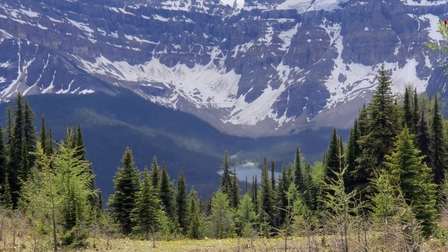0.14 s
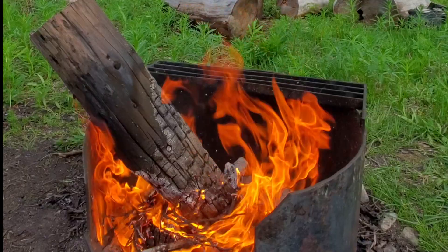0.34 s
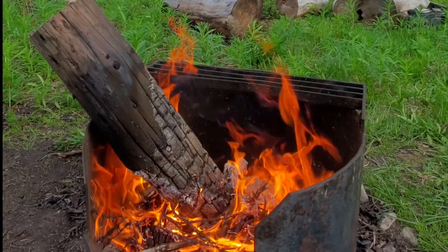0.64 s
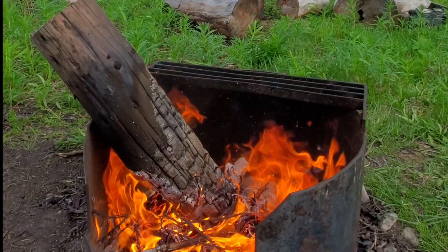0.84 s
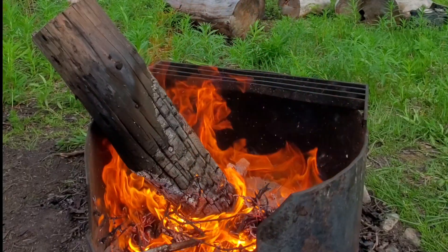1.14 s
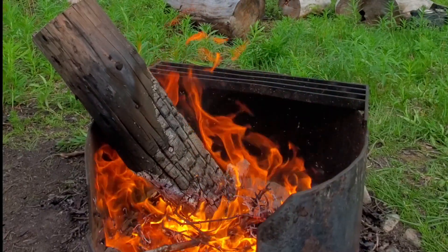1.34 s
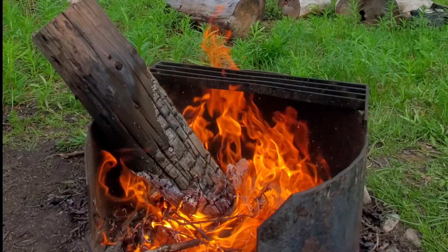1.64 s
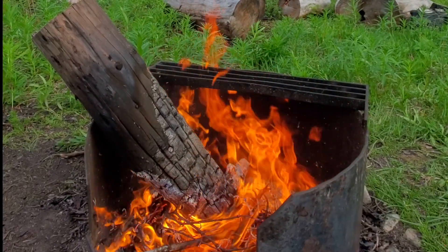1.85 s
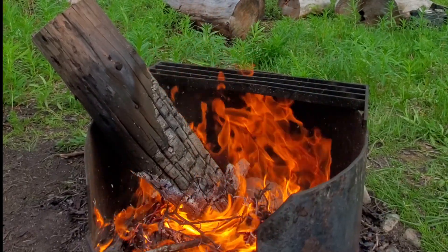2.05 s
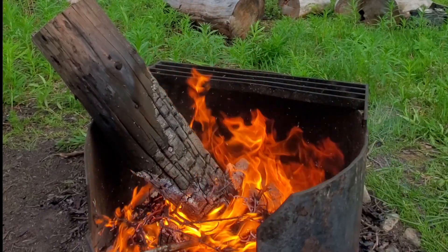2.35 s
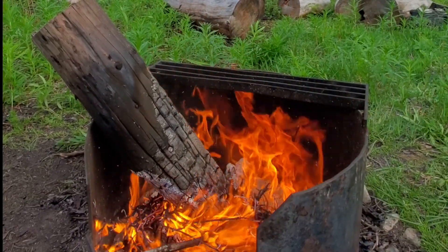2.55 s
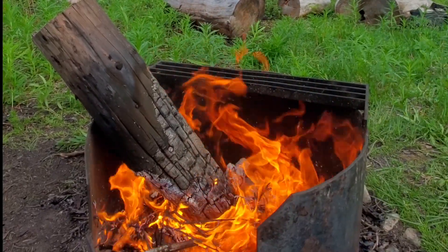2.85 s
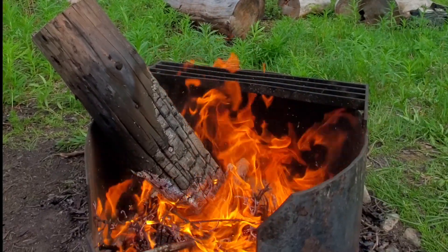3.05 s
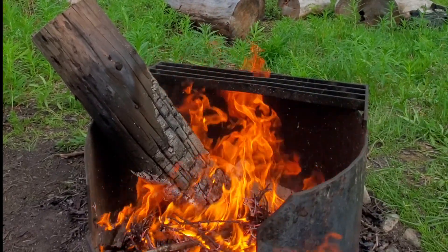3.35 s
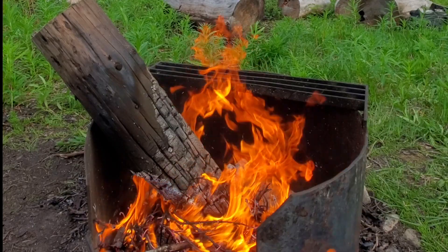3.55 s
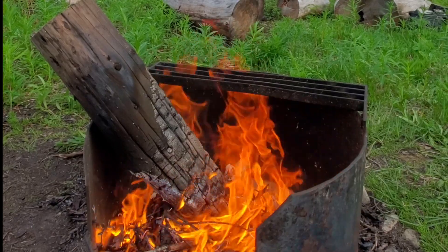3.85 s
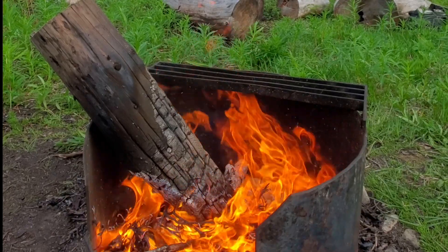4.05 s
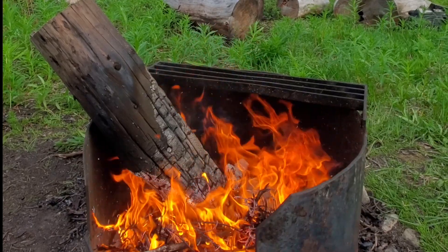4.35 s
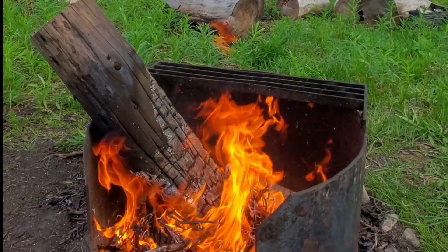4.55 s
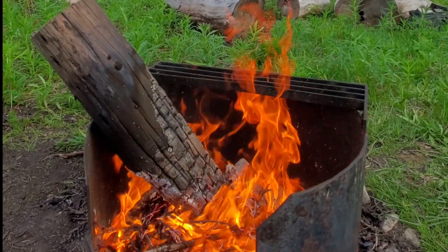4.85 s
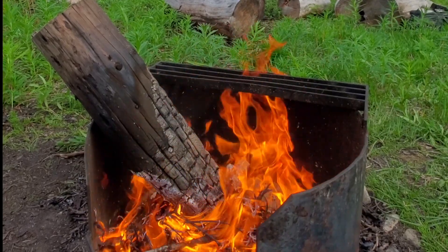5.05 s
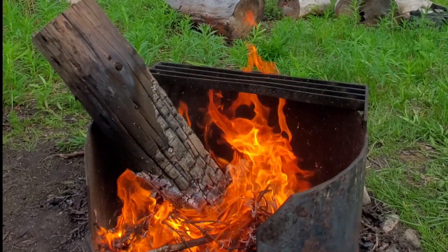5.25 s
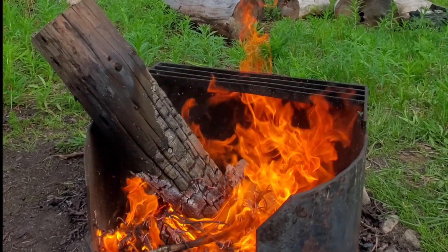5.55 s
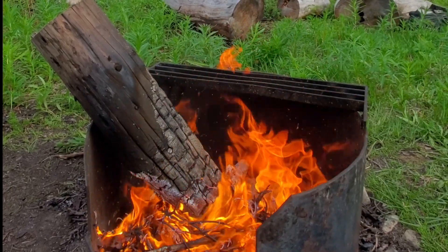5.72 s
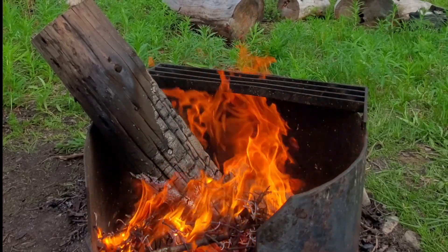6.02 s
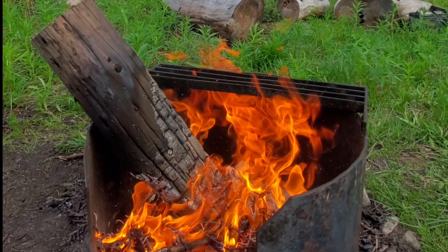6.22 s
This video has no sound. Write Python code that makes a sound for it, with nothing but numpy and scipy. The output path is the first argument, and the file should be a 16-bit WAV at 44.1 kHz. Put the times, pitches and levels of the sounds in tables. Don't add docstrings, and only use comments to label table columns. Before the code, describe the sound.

After a sliver of near-silence, a campfire in a steel drum crackles with sharp bangs, snaps and ticks over soft roar and deep wind buffeting.

```python
import sys
import numpy as np
from scipy import signal
from scipy.fft import rfft, irfft
from scipy.io import wavfile
from scipy.ndimage import uniform_filter1d, minimum_filter1d

SR = 44100
rng = np.random.default_rng(int(sys.argv[2]) if len(sys.argv) > 2 else 0)


def materialize(psi):
    bounded = np.clip(np.atleast_2d(psi).T, -1, 1)
    quanta = np.round(bounded * 32767).astype(np.int16)
    wavfile.write(sys.argv[1], SR, quanta)


def ratio_of_db(decibels):
    return 10 ** (np.asarray(decibels, float) / 20)


N = 281358
LEFT_LAG, BODY_LAG = 10, 6
TOP_HZ = 15900


def shaped(points, count):
    hz, db = np.transpose(points)
    bins_hz = np.arange(N // 2 + 1) * SR / N
    gain = ratio_of_db(np.interp(np.log(bins_hz + 1), np.log(hz), db, right=-200))
    x = irfft(rfft(rng.standard_normal((count, N))) * gain, N)
    return x / x.std(axis=1, keepdims=True)


def walk(rate, count):
    hold = int(SR / rate)
    held = np.repeat(rng.standard_normal((count, N // hold + 1)), hold, axis=1)
    x = uniform_filter1d(uniform_filter1d(held, hold), hold)[:, :N]
    return x / x.std()


def spaced(shared, own, likeness, lag):
    likeness = np.clip(likeness, 0, 1)
    both = np.stack([np.roll(shared, lag, axis=-1), shared], axis=-2)
    return np.sqrt(likeness) * both + np.sqrt(1 - likeness) * own


# pitch in Hz, level in dB.
STILL_TONE = [(18, -43), (30, -4), (189, -5.5), (486, -9), (632, -0.5), (1630, -14), (2540, -18),
              (16000, -29)]
STILL_DB = -79


def still_air():
    air = shaped(STILL_TONE, count=3)
    return spaced(air[0], air[1:], 0.26, lag=LEFT_LAG) * ratio_of_db(STILL_DB + 3.5)


def gusts(table):
    s, db, half_s, flutter_share_db = np.transpose(table)[:, :, None]
    t = np.arange(N // 64 + 2) * 64 / SR
    fall_db = 9 * ((t - s) / half_s) ** 2
    thump = ratio_of_db(2 * (db - fall_db))
    flutter = thump * ratio_of_db(2 * flutter_share_db)
    return [np.interp(np.arange(N) / SR, t, power.sum(axis=0)) for power in (thump, flutter)]


def even(x):
    return x / np.sqrt(uniform_filter1d(x ** 2, SR // 8))


# pitch in Hz, level in dB.
THUMP_TONE = [(18, -55), (35, -3.5), (77, 6.5), (110, -2.5), (170, -10), (300, -36), (600, -85.5)]
# pitch in Hz, level in dB.
FLUTTER_TONE = [(100, -7.5), (170, 1.5), (215, 0), (300, -9.5), (450, -17), (800, -35.5), (2000, -76.5)]
# middle in seconds, peak in dB, half length in seconds, flutter share in dB.
LEFT_GUSTS = [(.28, -53, 0.17, -12), (.53, -43, 0.1, -21), (.78, -45.5, 0.2, -12), (.95, -34, 0.12, -14.5),
              (1.23, -43.5, 0.17, -9), (1.5, -28, 0.15, -20.5), (1.71, -23.5, .15, -17.5),
              (2.14, -25.5, .14, -16), (2.39, -23, 0.23, -17), (2.63, -17, 0.11, -23.5),
              (2.85, -22, 0.18, -23.5), (3.23, -15.5, 0.13, -16), (3.83, -34.5, .09, -17.5),
              (4.03, -35.5, 0.057, -12), (4.53, -44.5, .08, -13), (5.13, -27, 0.074, -16),
              (5.28, -26, 0.11, -10), (5.65, -38.5, 0.28, -20), (5.83, -37.5, 0.1, -20),
              (6.03, -35, 0.053, -6.5), (6.23, -42, 0.21, -8.5)]
# middle in seconds, peak in dB, half length in seconds, flutter share in dB.
RIGHT_GUSTS = [(.28, -45, 0.32, -4.5), (.63, -43, 0.29, -6), (.92, -40, 0.24, -14.5),
               (1.23, -34.5, 0.13, -17), (1.63, -37.5, 0.37, -6.5), (1.93, -26.5, 0.1, -18.5),
               (2.14, -28, 0.064, -11), (2.36, -30, 0.18, -26), (2.83, -25, 0.073, -24),
               (3.03, -33.5, 0.1, -7.5), (3.33, -27, .14, -8.5), (3.58, -34.5, 0.16, -12.5),
               (3.83, -36.5, 0.15, -17.5), (4.04, -36.5, 0.098, -11.5), (4.57, -35.5, 0.19, -15),
               (4.73, -31.5, 0.1, -32), (4.95, -31, 0.093, -13.5), (5.13, -26.5, 0.28, -14.5),
               (5.32, -24.5, 0.14, -11.5), (5.53, -25, .1, -11), (5.7, -31.5, 0.1, -13),
               (5.93, -31.5, 0.15, -12), (6.13, -32.5, 0.11, -14), (6.36, -37.5, 0.21, -8.5)]
LEFT_LULL_DB, RIGHT_LULL_DB, LULL_FLUTTER_DB = -60.5, -52.5, -57.5


def wind():
    left, left_flutter = gusts(LEFT_GUSTS)
    right, right_flutter = gusts(RIGHT_GUSTS)
    left_db = 10 * np.log10(left + ratio_of_db(2 * LEFT_LULL_DB))
    right_db = 10 * np.log10(right + ratio_of_db(2 * RIGHT_LULL_DB))
    flutter_db = 10 * np.log10(left_flutter + right_flutter + ratio_of_db(2 * LULL_FLUTTER_DB))
    lean_db = 0.31 * (left_db - right_db) * np.array([[.5], [-.5]])
    puffs = ratio_of_db(4.5 * walk(34, count=2) + 2.2 * walk(60, count=2))
    thump = even(shaped(THUMP_TONE, count=2) * puffs)
    flutter = shaped(FLUTTER_TONE, count=3)
    flutter = even(spaced(flutter[0], flutter[1:], 0.35, lag=BODY_LAG) * puffs)
    return thump * ratio_of_db(np.array([left_db, right_db])) + flutter * ratio_of_db(flutter_db + lean_db + 1.5)


# pitch in Hz, level in dB.
ROAR_TONE = [(150, -33), (330, -10), (500, 4), (700, -5), (1100, -6), (1600, -12), (2600, -21.5),
             (5000, -40.5)]
# pitch in Hz, level in dB.
HISS_TONE = [(1000, 5), (2400, 4.5), (4300, -0.5), (6200, -2), (8200, -6.5), (11800, -1), (14500, -6.5),
             (16000, 3)]
# time in seconds, level in dB.
DRAUGHT = [
    (.28, -3),
    (1.59, -1),
    (2.46, 1.5),
    (3.2, -1.5),
    (3.76, -7.5),
    (4.2, -9),
    (4.63, -3.5),
    (5.07, 0),
    (5.5, -1.5),
    (6.37, 1),
]
ROAR_DB, HISS_DB = -57, -62
HISS_FOLLOWS = 0.59


def flames():
    s, db = np.transpose(DRAUGHT)
    draught_db = np.interp(np.arange(N) / SR, s, db)
    roar_db = ROAR_DB + draught_db + 1.5 + 1.3 * walk(14, count=1)
    hiss_db = HISS_DB + HISS_FOLLOWS * draught_db + 0.9 + 2.3 * walk(30, count=1)
    roar, hiss = shaped(ROAR_TONE, count=3), shaped(HISS_TONE, count=3)
    roar = spaced(roar[0], roar[1:], .45, lag=0) * ratio_of_db(roar_db)
    hiss = spaced(hiss[0], hiss[1:], 0.18, lag=LEFT_LAG) * ratio_of_db(hiss_db)
    return roar + hiss


def ring(burst, modes):
    size = burst.shape[-1]
    f = np.arange(size // 2 + 1) * SR / size
    response = 0
    for k, (hz, width_hz, db) in enumerate(modes):
        damping = 1j * f * width_hz
        response = response + (-1) ** k * ratio_of_db(db) * damping / (hz ** 2 - f ** 2 + damping)
    y = irfft(rfft(burst) * response, size)
    return y / np.sqrt(np.sum(y ** 2, axis=2, keepdims=True))


# pitch in Hz, width in Hz, level in dB.
BODY = [(204, 45, 5.5), (530, 74, 3), (740, 253, -3.5), (1444, 210, -0.5), (2050, 1820, -4),
        (3005, 770, -2)]
# pitch in Hz, width in Hz, level in dB.
SNAP = [(2840, 1140, -6.5), (4240, 1290, 5), (6200, 430, 4.5), (6770, 730, 4)]
# pitch in Hz, width in Hz, level in dB.
SIZZLE = [(9530, 2600, -1.5), (10700, 1930, 3), (15220, 6800, -5)]


def crackle(s, db, pan_db, body_db, treble_db, length_ms, size=4096):
    ms = np.arange(size) / SR * 1000
    chance = rng.standard_normal((len(s), 4, size))
    attack = 1 - np.exp(-(ms + 0.082) / 0.11)
    fast = np.exp(-ms / (2.66 * np.clip(length_ms, .15, 5)[:, None, None]))
    echoes = ratio_of_db(-20) * np.exp(-ms / 3.2)
    rattle = ratio_of_db(-32.0 + 0.42 * body_db)[:, None, None] * np.exp(-ms / 34)
    spikes = chance[:, :3] * ratio_of_db(5.86 * chance[:, 3:])
    spikes *= attack * (fast + echoes + rattle)

    spikes[:, 0, 3] += 4
    own = np.stack([np.roll(spikes[:, 1], LEFT_LAG, axis=-1), spikes[:, 2]], axis=1)
    thin = spaced(spikes[:, 0], own, 0.32, lag=LEFT_LAG)
    spikes[:, 0, 3] += 9
    thick = spaced(spikes[:, 0], own, 0.95, lag=BODY_LAG)

    treble = (ratio_of_db(treble_db) / np.sqrt(1 + ratio_of_db(2 * treble_db)))[:, None, None]
    sound = ring(thin, SNAP) * np.sqrt(1 - treble ** 2)
    sound += ring(thin * np.exp(-ms / 15), SIZZLE) * treble
    sound += ring(thick, BODY) * ratio_of_db(body_db + 3.0)[:, None, None]
    port_db = db[:, None] + np.outer(pan_db, [.5, -.5])
    sound *= ratio_of_db(port_db)[:, :, None] * np.sqrt(SR / 1000)

    out = np.zeros((2, N + size))
    for start, one in zip((s * SR).astype(int), sound):
        out[:, start:start + size] += one
    return out[:, :N]


# start in seconds, level in dB over 1 ms.
TICKS = [(.3422, -42), (0.3744, -43), (0.9327, -41.5), (1.2496, -35), (1.2698, -40), (1.275, -42.5),
         (1.5751, -45), (1.636, -41.5), (1.664, -44.5), (1.7012, -43), (1.967, -42), (2.2412, -39.5),
         (2.318, -46), (2.5178, -40), (2.6414, -47), (2.8482, -40), (3.792, -45), (4.0454, -41.5),
         (4.056, -46), (4.0754, -40.5), (4.353, -43), (4.6718, -46.5), (4.929, -41.5), (4.937, -40.5),
         (5.0106, -40.5), (5.7263, -44.5), (5.839, -45), (5.891, -44.5), (6.07, -39), (6.3765, -49)]
FAINT = [.45, .7012, .747, .8387, 1.0196, 1.0917, 1.174, 1.4745, 1.5951, 1.763, 1.9297, 1.9444, 2.3585,
         2.822, 2.869, 3.3342, 3.4284, 3.8998, 3.9126, 3.9208, 4.2122, 4.5474, 4.6132, 4.7072, 4.9137,
         5.139, 5.5789, 5.681, 5.8761, 6.146]
DUST = [.2891, .6327, .7732, .862, 1.0685, 1.3903, 1.524, 1.57, 1.8069, 2.264, 2.3249, 2.3479, 2.5024,
        2.6178, 3.5149, 3.6652, 3.6878, 3.8907, 4.039, 4.0974, 4.119, 4.232, 4.3185, 4.594, 4.6984, 5.1568,
        5.7399, 6.3357]
FAINT_DB, DUST_DB, TICK_SCATTER_DB = -49, -54, 0.7


def ticks():
    s, db = np.transpose(TICKS)
    faint_db = np.r_[[FAINT_DB] * len(FAINT), [DUST_DB] * len(DUST)]
    faint_db = faint_db + TICK_SCATTER_DB * rng.standard_normal(len(faint_db))
    s, db = np.r_[s, FAINT, DUST], np.r_[db, faint_db]
    same = np.ones(len(s))
    treble_db = 3.5 + 2.2 * rng.standard_normal(len(s))
    return crackle(s, db, -2.2 * same, -14 * same, treble_db, 0.63 * same, size=1024)


# start in seconds, level in dB over 1 ms, left minus right in dB,
# body share in dB, treble over middle in dB.
BANGS = [(.323, -18.5, 2, -20.5, 2), (.411, -18.5, -3.5, -45, -0.5), (.643, -10, -3, -8.5, -0.5),
         (1.1162, -21.5, 3.5, -18.5, 3), (1.4373, -17, -2, -18.5, 8), (1.5378, -18, -10, -20, 6),
         (1.6138, -18.5, 1, -33, 7), (1.9792, -21.5, -2.5, -13, 4.5), (2.1606, -17, -3, -22, 4),
         (2.631, -20, -7.5, -18, 4.5), (2.9585, -24, -3, -3.5, 1), (2.9686, -16.5, 0, -13.5, -3),
         (3.021, -9.5, 0.5, -4, -11), (3.154, -15, -1, -41, 2), (3.2362, -17.5, -0.5, -21, 3.5),
         (3.9968, -19.5, -1.5, -9, -6.5), (4.7174, -20, -4, -25, 3.5), (4.7507, -15, -0.5, -11.5, 5.5),
         (5.3496, -19.5, -0.5, -26.5, 5.5), (5.4216, -20, -2.5, -21, 2.5), (5.4737, -18.5, 0.5, -17, 3),
         (5.8655, -21, 1.5, -25, 9), (6.103, -20, -3, -20.5, -1.5), (6.1288, -19, 0.5, -22, 6)]
# start in seconds, level in dB over 1 ms, left minus right in dB,
# treble over middle in dB.
KNOCKS = [(0.2749, -30.5, -7, 3), (.3055, -31, 5, -10), (0.4272, -24, -0.5, 1), (.5374, -34, -7.5, 5.5),
          (.582, -33.5, -6, 8), (0.9808, -27.5, -2.5, 1), (1.3184, -33, -3, 0.5), (1.5417, -30, 12, 6),
          (1.844, -25.5, 1, 4), (2.1255, -36, -1, 4), (2.1754, -28.5, -2, 2.5), (2.4023, -27, -2, -9),
          (2.6716, -30.5, 3, 2), (2.8156, -35.5, 1, 0.5), (2.925, -37, -3, 8), (3.1561, -27.5, -1, 7),
          (3.47, -31, -5.5, -34), (3.4929, -34, -2, -2), (3.7736, -28.5, -2, 3.5), (4.1779, -31, -2, 6),
          (4.2211, -36, -1, -2), (4.4324, -34.5, -1.5, -1), (4.481, -27, -2, 8.5), (5.546, -31, 1, 12),
          (5.567, -27.5, -1.5, 4), (5.7693, -34.5, 1, 3), (5.958, -27.5, 0, -2.5), (6.1766, -32.5, 0, -3),
          (6.1853, -32, -1.5, -2), (6.31, -28, -2, -2)]
# start in seconds, level in dB over 1 ms, left minus right in dB,
# treble over middle in dB.
SNAPS = [(.2976, -22.5, -5, 11), (0.4927, -38, 1, 1), (0.6207, -31, -4, 4), (0.7646, -27, -12, 5.5),
         (1.0622, -23, -1.5, 3), (1.109, -29.5, -5, 4), (1.121, -25.5, -10, 4), (1.202, -32.5, 1, 6),
         (1.2302, -29, -4, 3.5), (1.921, -36.5, -1, 4), (2.6765, -21.5, -15.5, 10), (2.6846, -24.5, 10, 6),
         (3.0514, -34.5, -5, 4), (3.307, -32, -3, 5.5), (3.7188, -24.5, -2, 6.5), (3.8453, -25.5, -1, -1.5),
         (4.3457, -25, -3.5, 3.5), (4.873, -25.5, 0, 1.5), (5.0432, -28.5, -3, 4.5), (5.3149, -36, 10, 1),
         (5.3316, -29, -5, -1), (5.4103, -36, -4, 5), (5.466, -37.5, -2, 6), (5.5519, -31, -3, -4),
         (5.6134, -23, 3, 11), (5.807, -36.5, -1, 1), (5.8138, -34.5, -5, 7.5), (6.0626, -34.5, -4, -3),
         (6.2683, -29, -3, 5), (6.323, -36, 0, 1)]
# start in seconds, level in dB over 1 ms, left
# minus right in dB, treble over middle in dB, burst length in ms.
SPUTTERS = [
    (0.314, -37, -6, -13, .3),
    (1.026, -37.5, -4, -1, 0.36),
    (1.238, -39, 12, 1, 2.5),
    (1.2455, -39.5, -15, 2, 2.7),
    (3.032, -36, 7, -19, 3.6),
    (3.4444, -41, 9, -23, 1.3),
    (3.447, -37.5, -4.5, 2, 1.1),
    (3.982, -40, -5, -1, .97),
    (4.82, -37, -2.5, 3.5, 2.3),
]
KNOCK_BODY_DB, SNAP_BODY_DB, SPUTTER_BODY_DB = -11, -21.5, -8
BURST_MS, BURST_MS_PER_BODY_DB = 1.26, 0.06


def pops():
    rows = [tuple(row) for row in BANGS]
    rows += [(s, db, pan, KNOCK_BODY_DB, treble) for s, db, pan, treble in KNOCKS]
    rows += [(s, db, pan, SNAP_BODY_DB, treble) for s, db, pan, treble in SNAPS]
    rows = [row + (BURST_MS + BURST_MS_PER_BODY_DB * row[3],) for row in rows]
    rows += [(s, db, pan, SPUTTER_BODY_DB, treble, ms) for s, db, pan, treble, ms in SPUTTERS]
    return crackle(*np.transpose(rows))


def scene():
    change = np.clip((np.arange(N) / SR - .245) / 0.026, 0, 1)
    fire = wind() + flames() + ticks() + pops()
    return still_air() * (1 - change) + fire * change


def lose_faint_treble(x, mask_db, floor_db, scatter_db, size=256, count=4):
    f, _, z = signal.stft(x, SR, nperseg=size)
    power = uniform_filter1d(np.abs(z) ** 2, count, axis=1)
    treble = np.mean(power[:, f > 2500], axis=1, keepdims=True) + 1e-18
    nearby = -minimum_filter1d(-treble, 2 * count + 1, axis=2)
    quiet = minimum_filter1d(treble, size // 10, axis=2)
    quiet = uniform_filter1d(quiet, size // 10, axis=2)
    patch = rng.standard_normal((len(f) // count + 1, z.shape[2] // count + 1))
    patch = patch.repeat(count, axis=0).repeat(count, axis=1)[:len(f), :z.shape[2]]
    limit = nearby * ratio_of_db(2 * mask_db) + quiet * ratio_of_db(2 * floor_db)
    limit = limit * ratio_of_db(2 * scatter_db * patch)
    limit[:, f > TOP_HZ] *= 1000
    dropped = (power < limit) & (f > 3000)[:, None]
    return signal.istft(np.where(dropped, 0, z), SR, nperseg=size)[1][:, :N]


def band_limit(x):
    return signal.sosfilt(signal.butter(12, 17150, fs=SR, output="sos"), x)


def record(dry):
    top = signal.butter(10, 1.02 * TOP_HZ, fs=SR, output="sos")
    mix = lose_faint_treble(signal.sosfilt(top, dry), mask_db=-34, floor_db=-2, scatter_db=6)
    return band_limit(mix)


dry = scene()
out = record(dry)
materialize(out)
```